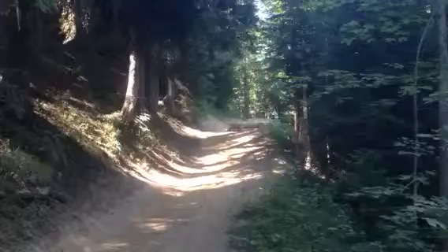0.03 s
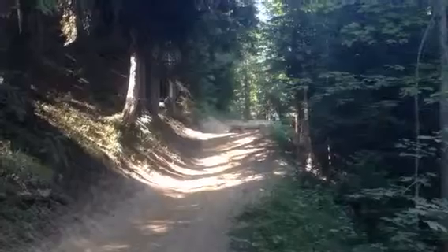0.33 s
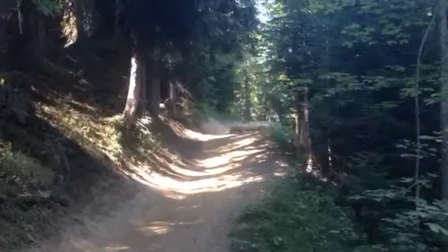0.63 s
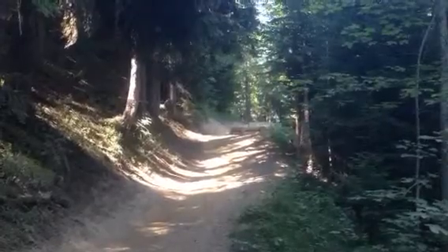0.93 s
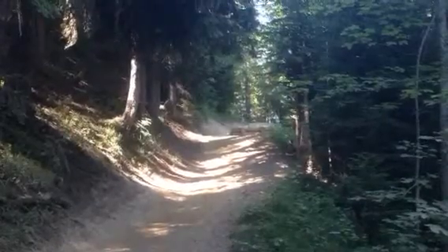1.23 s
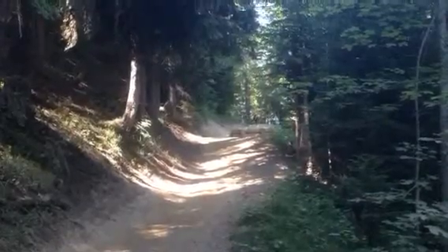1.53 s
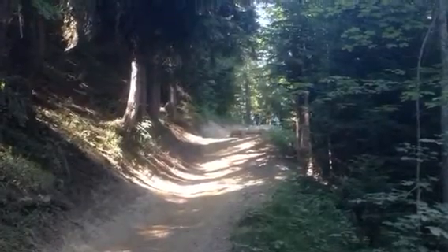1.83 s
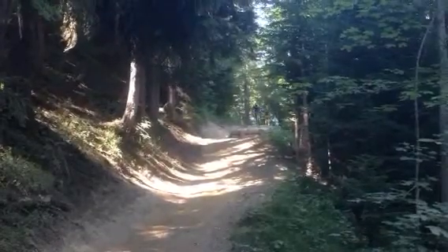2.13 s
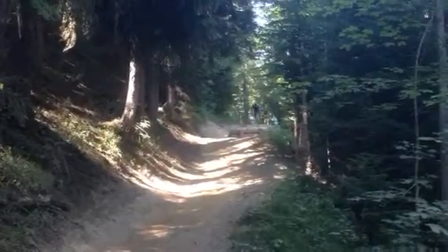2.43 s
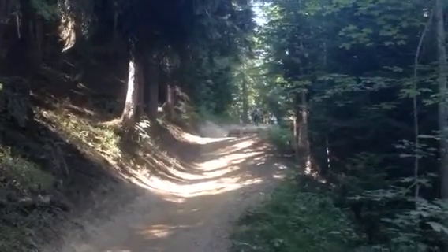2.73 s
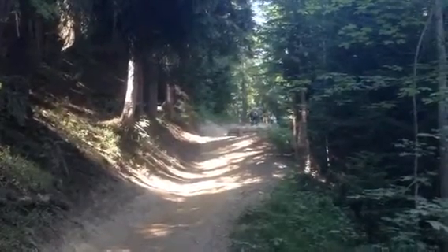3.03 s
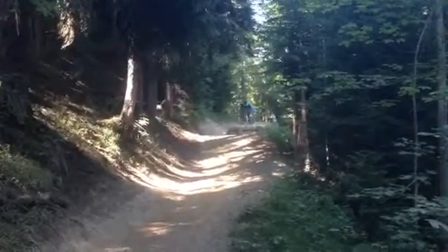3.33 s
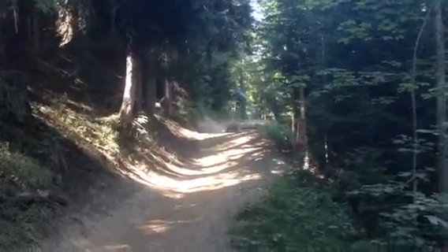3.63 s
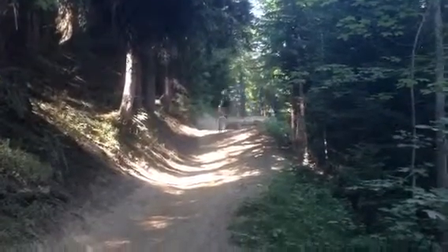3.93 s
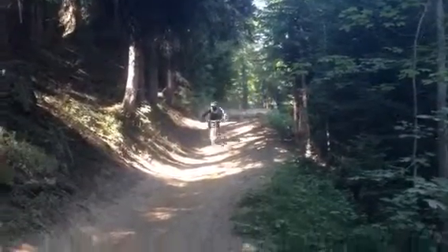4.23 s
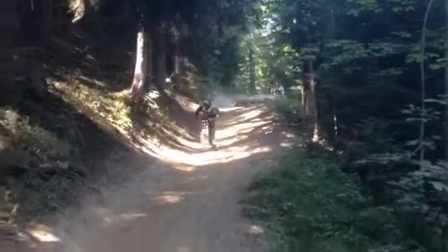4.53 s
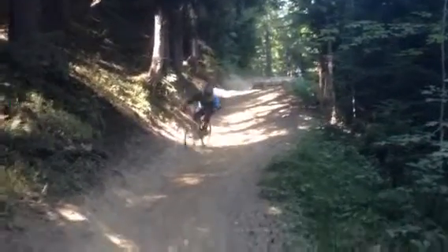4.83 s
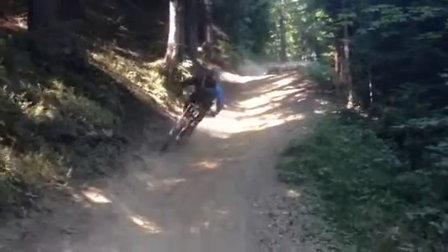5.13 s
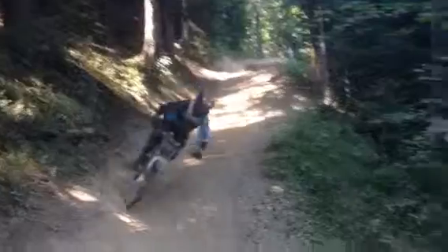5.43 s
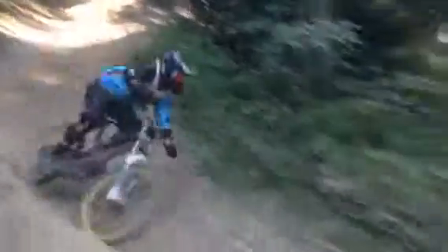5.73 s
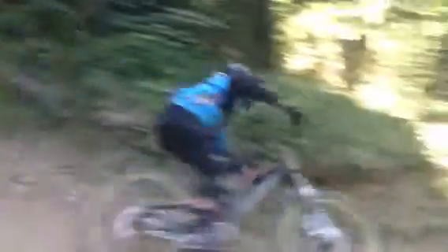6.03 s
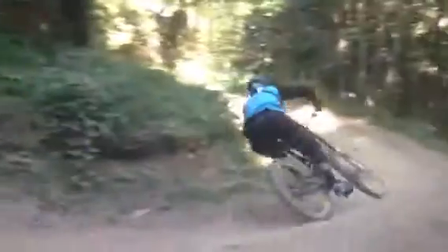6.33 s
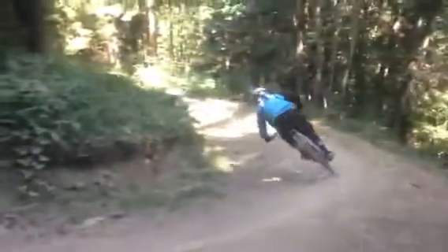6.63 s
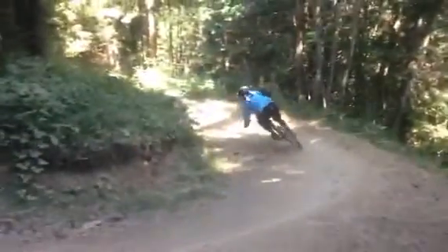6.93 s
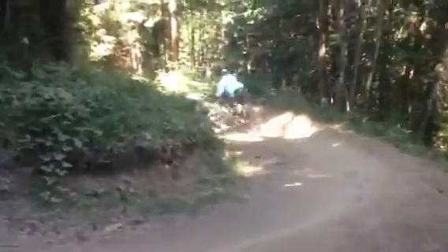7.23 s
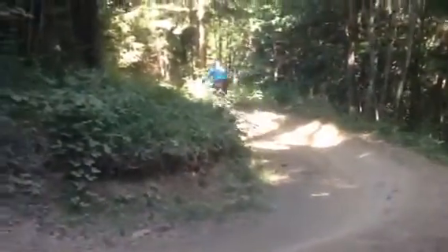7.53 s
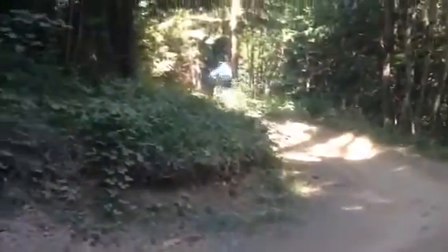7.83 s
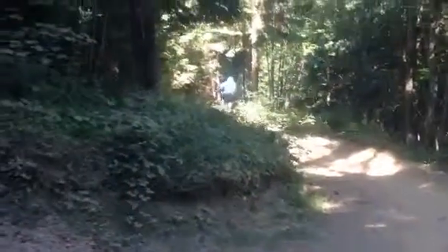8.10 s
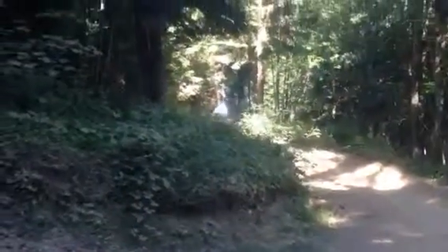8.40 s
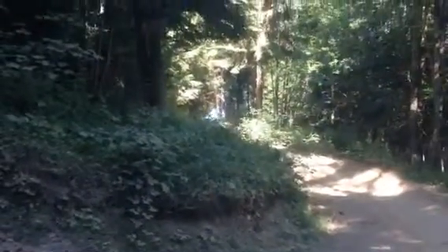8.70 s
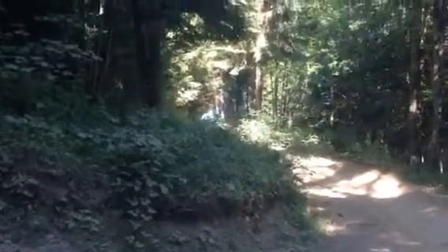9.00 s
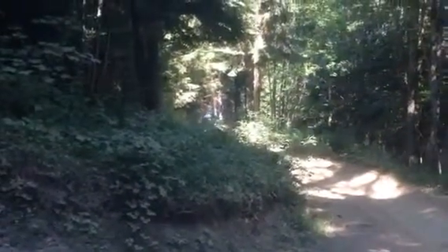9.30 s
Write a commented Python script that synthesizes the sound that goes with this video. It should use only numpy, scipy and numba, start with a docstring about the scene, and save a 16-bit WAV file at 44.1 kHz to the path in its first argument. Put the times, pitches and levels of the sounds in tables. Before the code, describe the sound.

A soft, steady forest hiss with a low rumble runs throughout. In the first second there are a few faint handling ticks. Until about 4 seconds, a mountain bike is only distant, with light tyre crunch, small knocks and dull thuds. At about 4.2 seconds it lands off a small drop with a clatter, and the knobbly tyres begin crunching and drumming on the dirt, coming nearer. Stones knock the wheels, with the sharpest knock near 5.7 seconds. The bike passes close between 5.6 and 6.4 seconds, the loudest part, with low thuds from ruts, bright chain clinks, frame rattle, sprayed grit and a faint freewheel sizzle. Crunching and clinking continue as it rides away, dropping off at about 7.4 seconds. A few soft, distant thuds and knocks follow until about 9.5 seconds. The trees add a slight, short echo.

```python
"""Mountain bike on a forest trail

A bike comes down a dirt trail, lands off a small drop, leans past close by and rides away.
Knobbly tyres crunch the dirt and drum with the air inside; stones knock the wheels, ruts thud,
the frame clatters, the chain clinks, the freewheel sizzles. Trees scatter it over low rumble and hiss."""
import sys
import numpy as np
from scipy import signal
from scipy.fft import rfft, irfft
from scipy.io import wavfile
from scipy.ndimage import uniform_filter1d
from numba import njit

SR = 44100
rng = np.random.default_rng(int(sys.argv[2]) if len(sys.argv) > 2 else 0)


def wav_record(signal):
    """Record a signal, one row per channel, as 16-bit PCM in the file named by sys.argv[1]."""
    frames = np.transpose(np.atleast_2d(signal))
    bounded = np.clip(frames, -1, 1)
    # unit amplitude maps onto the largest positive 16-bit level
    quanta = np.round(bounded * 32767).astype(np.int16)
    wavfile.write(sys.argv[1], SR, quanta)


N = 421596

# ticks of a hand-held case: t/s, level/dB
CASE_TICKS = [(0.1376, -55), (0.271, -53), (0.4075, -58), (0.4938, -57), (0.6843, -50), (0.7567, -49),
              (0.7637, -54)]
# distant thuds: t/s, level/dB
THUDS = [(0.694, -52.5), (0.774, -52), (2.172, -58), (2.803, -56), (3.55, -53), (7.473, -44.5), (7.92, -53),
         (8.014, -56), (8.08, -57), (8.291, -47.5), (9.308, -56)]
# distant rough stretches: t/s, rise/s, level/dB, decay/(dB/s)
STRETCHES = [(0.85, 0.28, -66.5, 5), (2.78, 0.15, -62, 15.5), (8.47, 0.076, -66.5, 7),
             (9.42, 0.15, -81, 10)]
# chain slaps: t/s, level/dB, f/Hz
CLINKS = [(4.2696, -46.5, 4360), (4.317, -38, 4300), (4.7542, -41, 4270), (4.9092, -35.5, 3700),
          (4.9651, -43.5, 4100), (5.064, -49, 4200), (5.1497, -47, 4300), (5.251, -46.5, 4150),
          (5.484, -40.5, 6340), (5.506, -35.5, 2980), (5.547, -44, 5740), (5.575, -38, 2940),
          (5.6123, -41, 2800), (5.676, -37, 2820), (5.769, -39, 2740), (5.8328, -24.5, 3230),
          (5.877, -43.5, 5670), (5.9287, -27.5, 3900), (5.956, -32.5, 2700), (5.977, -54, 2980),
          (5.9979, -23.5, 2940), (6.009, -28, 2940), (6.0215, -32, 2960), (6.046, -32, 2930),
          (6.1, -27, 3000), (6.1135, -21, 2920), (6.1405, -26, 2900), (6.177, -38, 2980),
          (6.201, -36, 3230), (6.209, -31.5, 3350), (6.2604, -44, 3330), (6.3366, -42, 3380),
          (6.352, -45.5, 6650), (6.385, -37.5, 4130), (6.463, -43, 3410), (6.495, -41, 3530),
          (6.516, -34.5, 4150), (6.564, -44, 3400), (6.617, -37, 3750), (6.6642, -38.5, 3640),
          (6.7258, -38.5, 3570), (6.809, -46, 3930), (6.842, -38, 3530), (6.8594, -29.5, 3820),
          (6.9137, -39.5, 3700), (6.938, -36, 3530), (6.9791, -52, 3360), (7.039, -45, 3950),
          (7.062, -42.5, 3390), (7.1023, -48, 3440), (7.159, -45, 3760), (7.2056, -41, 3400),
          (7.259, -40, 3170), (7.3136, -45, 3760)]
# frame, fork and mudguard hits: t/s, level/dB
CLATTERS = [(2.799, -52.5), (3.295, -54), (4.19, -49), (4.226, -44), (4.296, -38.5), (4.321, -40),
            (4.714, -44), (4.757, -38), (5.078, -34), (5.086, -32.5), (5.173, -35), (5.186, -37),
            (5.558, -42), (5.677, -28), (5.767, -32), (5.833, -29), (6.009, -27.5), (6.291, -36)]
# wheel drops into ruts: t/s, level/dB, f/Hz
RUTS = [(5.555, -31.5, 80), (5.572, -37, 240), (5.659, -25, 207), (5.669, -35, 110), (5.763, -37, 72),
        (5.838, -39, 80), (5.884, -38, 85), (5.953, -32, 129), (5.971, -29, 284), (6.061, -36, 78),
        (6.119, -41, 100), (6.197, -31, 93), (6.295, -37, 89.5), (6.335, -27.5, 102), (6.377, -43, 100),
        (6.416, -36, 89.5), (6.455, -42, 84.5), (6.535, -39, 170), (6.573, -31.5, 113), (6.59, -42, 120),
        (6.608, -36, 100), (6.755, -44, 140), (6.821, -46, 65), (6.88, -48, 100), (6.893, -33.5, 230),
        (7.057, -39, 87), (7.107, -43, 83), (7.172, -48, 83), (7.221, -51, 90), (7.255, -48, 116)]
# stones and ruts hitting the wheels: t/s, ring level/dB, ring f/Hz, thump level/dB, dirt level/dB
KNOCKS = [(0.991, -49, 490, -63, -58), (1.038, -50, 555, -51, -63), (1.207, -56, 990, -70, -53),
          (1.328, -50, 565, -64, -56), (1.405, -48, 594, -67, -60), (1.505, -52, 1020, -53, -57),
          (1.608, -47, 564, -53, -56.5), (1.734, -53, 510, -70, -58), (2.804, -43, 900, -61, -53),
          (4.1966, -42, 1870, -60, -43.5), (4.228, -33.5, 796, -52, -42), (4.279, -28, 663, -52, -42),
          (4.303, -32, 1240, -42.5, -45), (4.553, -36, 876, -43, -43), (4.6, -26.5, 853, -54, -43),
          (4.658, -35, 890, -56, -49), (4.7034, -32, 960, -43, -38), (4.7175, -34.5, 1850, -41, -42),
          (5.083, -28.5, 1535, -38, -32.5), (5.177, -40, 1030, -41, -34), (5.466, -25.5, 653, -58, -33),
          (5.474, -28.5, 680, -52, -50), (5.559, -21.5, 790, -32, -28.5), (5.5774, -23, 482, -44, -31),
          (5.614, -31, 795, -48, -32), (5.652, -24, 735, -38, -40), (5.661, -6.5, 840, -27, -25.5),
          (5.6663, -17, 956, -36, -40), (5.68, -31, 1400, -42, -41), (5.732, -32, 452, -48, -44),
          (5.742, -29, 960, -50, -49), (5.767, -29, 800, -35.5, -26), (5.891, -26, 750, -36, -33),
          (5.955, -40, 704, -30.5, -33), (6.0641, -21, 860, -36, -36), (6.0878, -26, 740, -37, -45),
          (6.1643, -27, 720, -37, -31), (6.2015, -23, 904, -36, -28.5), (6.242, -34, 885, -59, -43),
          (6.292, -26, 1820, -45, -33), (6.336, -32, 1090, -32.5, -27.5), (6.348, -34, 1000, -50, -38),
          (6.381, -32, 920, -52, -44), (6.4242, -34, 850, -46, -38), (6.4596, -33, 876, -57, -38),
          (6.494, -30.5, 1230, -60, -36), (6.53, -34, 1740, -46, -41), (6.5772, -30, 1650, -38, -33.5),
          (6.6132, -41, 810, -39, -41), (6.749, -51, 750, -54, -58), (6.769, -40, 710, -47, -60),
          (6.827, -38, 1160, -50, -35), (6.8436, -19, 1110, -59, -33.5), (6.845, -22, 2000, -61, -42),
          (6.885, -37, 980, -52, -35), (6.8962, -40, 940, -45, -36), (6.9434, -33.5, 1920, -60, -36),
          (7.014, -42, 845, -48, -40), (7.045, -33, 850, -61, -50), (7.065, -34, 830, -47, -44),
          (7.114, -34.5, 695, -49, -31.5), (7.175, -26, 760, -36, -49), (7.193, -30.5, 1265, -42, -41),
          (7.2263, -24.5, 860, -44, -49), (7.243, -29.5, 1670, -41, -45), (8.734, -55, 730, -66, -47.5),
          (8.753, -49, 1970, -77, -53), (9.054, -58, 735, -71, -59), (9.507, -57, 1680, -67, -54)]
# tread bite after landing: t/s, f/Hz, level/dB
GROWL = [(4.2, 650, -85), (4.3, 686, -54), (4.37, 770, -54), (4.45, 710, -52), (4.58, 870, -55.5),
         (4.72, 890, -67), (4.95, 900, -62)]
# tyre crunch from the landing on: t/s, level/dB
ROLL = [(4.17, -76), (4.23, -53.5), (4.31, -42.5), (4.42, -50), (4.9, -48.5), (5.35, -50.5), (5.58, -44.5),
        (5.69, -42.5), (5.87, -40), (6.0, -38.5), (6.15, -38.5), (6.36, -45), (6.5, -44), (6.7, -46.5),
        (6.88, -46.5), (7.26, -45.5), (7.41, -57), (7.92, -62), (8.12, -70)]
# grit sprayed by sliding tyres: t/s, half-width/s, level/dB
SPRAYS = [(4.327, 0.024, -63), (4.94, 0.042, -65), (6.115, 0.039, -57), (6.89, 0.023, -63),
          (7.34, 0.1, -71), (9.158, 0.1, -66)]
# tyre air mode, higher and broader in the turn: t/s, f/Hz, width/Hz
CAVITY = [(4.2, 228.4, 26), (5.5, 230, 21), (5.75, 243, 63), (6.0, 260, 130), (6.18, 270, 120),
          (6.45, 217, 59), (7.3, 217, 39), (7.8, 210, 30)]

# resonances: f/Hz, width/Hz, level/dB
CASE_MODES = [(1360, 120, 3.5), (1850, 260, -5), (2140, 140, 2), (2870, 250, -15)]
THUD_MODES = [(210, 71, 11), (352, 59, -6), (560, 120, -42)]
TYRE_AIR_MODES = [(219.7, 25, 26), (262, 35, -23)]
PAWL_MODES = [(6300, 420, 0), (6700, 420, -1)]
SPROCKET_MODES = [(2565, 70, 15), (2912, 40, 17.5), (3100, 73, -5), (3800, 220, 2.5), (4240, 250, 0.5),
                  (4930, 270, -3), (5360, 300, 6.5), (5690, 300, 12), (6030, 240, 6.5), (7300, 260, -4)]
FRAME_MODES = [(1020, 73, -7), (1394, 77, -1), (1476, 57, 0), (1785, 65, -2.5), (1920, 77, 1),
               (2487, 83, -2)]
TREAD_MODES = [(2500, 280, 15), (2700, 370, -2), (2840, 110, -15), (3210, 240, -22)]

# ambient spectrum: f/Hz, level/dB
FOREST_TONE = [(12, -37), (20, -18.5), (61, 0), (112, -2), (140, -3), (244, -16), (341, -18), (462, -19.5),
               (664, -23), (1190, -26), (1290, -25.5), (1810, -24.5), (2820, -23), (3720, -27),
               (15400, -32)]
# clink spectra: f/Hz, level/dB
LINK_TONE = [(900, -18.5), (1900, 14), (2250, 4), (2550, 5), (2950, 7), (3450, 4.5), (3900, 9), (4400, 7),
             (6000, 0.5), (8000, -4), (9500, -23), (14000, -48)]
CRACK_TONE = [(1500, -50.5), (2500, -12.5), (3900, 3), (4600, 4.5), (5600, -4), (6500, 0.5), (7800, -5),
              (8900, -24.5), (14000, -30.5)]
EDGE_TONE = [(3000, -31), (6000, -8), (9700, 15), (11500, -8), (14500, -9)]
# knock spectra: f/Hz, level/dB
THUMP_TONE = [(20, -14), (45, -1), (90, -8.5), (180, -3.5), (300, -2.5), (500, -11), (900, -49),
              (3000, -71), (9000, -98)]
DIRT_TONE = [(100, 0.5), (300, -1.5), (800, 7.5), (1400, 5.5), (2050, 1.5), (2400, -11.5), (3200, -12),
             (5000, -25), (8000, -32), (13000, -66)]
# rolling spectra: f/Hz, level/dB
FAR_COMING_TONE = [(150, -7), (260, -6.5), (330, 2), (420, 0.5), (520, 7), (740, -5.5), (920, -0.5),
                   (1150, -5.5), (1500, -3), (2000, -5), (3000, -11.5), (6000, -21), (12000, -48)]
FAR_GOING_TONE = [(150, -6), (300, -11), (800, -2), (1300, -2), (1900, 3), (2400, -2.5), (3300, -6),
                  (6000, -13), (12000, -31)]
NEAR_COMING_TONE = [(150, -27), (310, 3.5), (480, 8), (660, 3.5), (830, 4), (1060, 0), (1270, -2),
                    (1500, 0), (1660, -2), (1880, 0.5), (2300, -12), (3200, -45), (5000, -20), (12000, -61)]
NEAR_GOING_TONE = [(150, -9), (320, 5), (420, -6.5), (500, 2.5), (580, 1.5), (810, 3), (1100, -5.5),
                   (1400, -1), (1700, -1.5), (2050, 1), (2400, -22), (2800, -19), (3400, -8), (5000, -40),
                   (12000, -64)]
RUMBLE_TONE = [(20, -19), (40, -19), (65, 4.5), (110, 3), (165, 9), (280, -19.5), (600, -39), (4000, -86)]
GRIT_TONE = [(1500, -2), (3000, -4.5), (3800, 1), (4250, -1.5), (4600, -3.5), (5600, -7), (6500, -5.5),
             (7600, -11.5), (8800, -17), (14000, -26)]

PASS_S, REAR_PASS_S = 5.81, 6.19


def undb(db):
    """dB to gain."""
    return 10 ** (np.asarray(db) / 20)


def unit(x):
    """Scale to rms 1."""
    return x / np.sqrt(np.mean(x ** 2))


def unit_peak(x):
    """Scale to peak 1."""
    return x / np.abs(x).max()


def add(out, at_s, x):
    """Mix x in at at_s."""
    i = max(int(at_s * SR), 0)
    out[i:i + len(x)] += x[:N - i]


def colour(x, tone, size=4096):
    """Minimum-phase filter; tone: f/Hz, level/dB."""
    hz, db = np.transpose(tone)
    log_hz = np.log(np.fft.rfftfreq(size, 1 / SR) + 1)
    log_gain = np.log(undb(np.interp(log_hz, np.log(hz), db)))
    cepstrum = irfft(log_gain)[:size // 2]
    cepstrum[1:] *= 2
    impulse = irfft(np.exp(rfft(cepstrum, size)))[:size // 2]
    return signal.fftconvolve(x, impulse)[:len(x)]


def ring(x, modes):
    """Parallel resonators; modes: f/Hz, width/Hz, level/dB."""
    return sum(undb(db) * signal.lfilter(*signal.iirpeak(hz, hz / width_hz, fs=SR), x)
               for hz, width_hz, db in modes)


@njit
def sweep(x, hz, width_hz):
    """State-variable band-pass with moving centre and width."""
    y, band, low = np.empty(len(x)), 0., 0.
    for i in range(len(x)):
        g, damping = np.tan(np.pi * hz[i] / SR), width_hz[i] / hz[i]
        v = (band + g * (x[i] - low)) / (1 + g * (g + damping))
        band, low, y[i] = 2 * v - band, low + 2 * g * v, damping * v
    return y


def fade(t, t60_s):
    """Exponential decay, -60 dB at t60_s."""
    return np.exp(-np.log(1000) * t / max(t60_s, 1e-3))


def swell(t, at_s, half_s, db):
    """Gaussian envelope."""
    return undb(db) * np.exp(-((t - at_s) / half_s) ** 2)


def walk(rate_hz):
    """Slewed random steps, rms 1."""
    hold = int(SR / rate_hz)
    steps = np.repeat(rng.standard_normal(N // hold + 1), hold)
    return unit(uniform_filter1d(steps, hold)[:N])


def grains(rate_hz, spread_db):
    """Tiny impacts at random times."""
    strength = undb(spread_db * np.clip(rng.standard_normal(N), -2, 2))
    return (rng.random(N) < rate_hz / SR) * strength * rng.choice([-1, 1], N)


def taps(table, modes, contact_t60_s, size=5000):
    """Short rough contacts on a resonant body."""
    out, t = np.zeros(N), np.arange(size) / SR
    for at_s, db in table:
        contact = rng.standard_normal(size) * fade(t, contact_t60_s)
        add(out, at_s, undb(db) * unit_peak(ring(contact, modes)))
    return out


def roll_gain(t):
    """Envelope of the near tyres."""
    return undb(np.interp(t, *np.transpose(ROLL), left=-120, right=-120))


def facing(t, coming_db, going_db):
    """Gain that shifts as the rear wheel passes."""
    behind = .5 + .5 * np.tanh((t - REAR_PASS_S) / 0.019)
    return undb(coming_db + (going_db - coming_db) * behind)


def forest(level_db=-60):
    """Steady hiss; the low rumble of the air wavers."""
    air = unit(colour(rng.standard_normal(N), FOREST_TONE))
    low = signal.sosfiltfilt(signal.butter(2, 220, fs=SR, output="sos"), air)
    waver_db = 1.2 * walk(6) + 2.6 * walk(28) - 0.7
    return undb(level_db) * (air + low * (undb(waver_db) - 1))


def trees(x, t60_s=0.33, send_db=-10.5):
    """Trunks and banks return a thin tail."""
    t = np.arange(SR) / SR
    echoes = rng.laplace(size=len(t)) * fade(t, t60_s) * (t > .006)
    tone = [(100, -5.5), (400, 3.5), (2000, -9.0), (5000, 1.5), (12000, 5.5)]
    impulse = colour(echoes / np.linalg.norm(echoes), tone)
    return undb(send_db) * signal.fftconvolve(x, impulse)[:N]


def case_ticks():
    """Faint contacts ring a hand-held case."""
    hits = taps(CASE_TICKS, CASE_MODES, contact_t60_s=0.011)
    return undb(3.5) * colour(hits, [(500, -14), (1200, 0.0), (2800, -1.0), (5000, -18)])


def far_thuds():
    """Soft, dull impacts in the distance."""
    hits = taps(THUDS, THUD_MODES, contact_t60_s=0.042)
    return undb(5.5) * colour(hits, [(600, -3.0), (2000, -31)])


def pebbles(count, spread_db, size=1000):
    """Stones flicked by the tread, each ringing at its own pitch; small ones shorter but harder."""
    out, t = np.zeros(N), np.arange(size) / SR
    for moment, pitch, sustain, force in rng.random((count, 4)):
        hz = 750 * 3.4 ** pitch
        decay = t * hz / (4.5 + 4 * sustain)
        ping = np.sin(2 * np.pi * hz * t) * np.exp(-decay) * (1 - np.exp(-6 * decay))
        add(out, moment * N / SR, undb(spread_db * force) * np.sqrt(hz) * ping)
    return unit(out)


def far_tyres(drum_db=-3):
    """Distant crunch and drumming; each rough stretch swells and dies away."""
    t = np.arange(N) / SR
    gain = sum(np.clip((t - at_s) / rise_s, 0, 1) * undb(db - db_per_s * np.maximum(t - at_s - rise_s, 0))
               for at_s, rise_s, db, db_per_s in STRETCHES)
    stones = undb(-18) * pebbles(count=900, spread_db=12)
    crush = (unit(grains(rate_hz=2200, spread_db=2.5)) + stones) * undb(1.2 * walk(70))
    bumps = grains(rate_hz=750, spread_db=2.5)
    air = unit(ring(ring(bumps, TYRE_AIR_MODES), [(226, 170, 0)]))
    dirt = np.where(t < PASS_S, unit(colour(crush, FAR_COMING_TONE)), unit(colour(crush, FAR_GOING_TONE)))
    return gain * (dirt + undb(drum_db + 2 * walk(5.4)) * air)


def freewheel(nominal_hz=310, level_db=-60.5, nearest_s=6.17, half_s=0.25):
    """Coasting: pawls tick fast and unevenly, a sizzle that peaks as the hub passes."""
    t = np.arange(N) / SR
    teeth = np.floor(np.cumsum(nominal_hz * undb(3 * walk(400))) / SR)
    ticks = np.diff(teeth, prepend=0) * undb(6.5 * walk(120))
    sizzle = unit(ring(ring(ticks, PAWL_MODES), [(6250, 2300, 0)]))
    return undb(level_db) * sizzle / (1 + ((t - nearest_s) / half_s) ** 2)


def chain_rattle(count=24, re_roll_db=-8, base_hz=3300):
    """Small random clinks that follow the tyre level: t/s, level/dB, f/Hz."""
    start_s, end_s = ROLL[0][0], ROLL[-1][0]
    times_s = start_s + (end_s - start_s) * (np.arange(count) + rng.random(count)) / count
    return [(at_s, 20 * np.log10(roll_gain(at_s)) + re_roll_db + 2 * force, base_hz * 2 ** (.45 * pitch))
            for at_s, (force, pitch) in zip(times_s, rng.uniform(-0.64, 1, (count, 2)))]


def chain(lag_s=0.0034, size=4000):
    """Links slap frame and sprockets: both links and sprockets ring, with a crack and a bright edge."""
    out, t = np.zeros(N), np.arange(size) / SR
    next_links = undb(-10) * (t > lag_s) * fade(np.abs(t - lag_s), 0.013)
    for at_s, db, hz in list(CLINKS) + chain_rattle():
        contact = rng.standard_normal(size) * (fade(t, 0.015) + next_links)
        link = unit_peak(ring(contact, [(hz, 380, 0), (hz * rng.uniform(0.77, 1.45), 450, -2)]))
        sprockets = unit_peak(ring(contact, SPROCKET_MODES))
        metal = unit_peak(colour(undb(5.5) * link + sprockets, LINK_TONE))
        crack = unit_peak(colour(unit_peak(contact) + undb(-2) * sprockets, CRACK_TONE))
        edge = unit_peak(colour(contact * fade(t, 0.02), EDGE_TONE)) * facing(at_s, -29, -15.5)
        add(out, at_s, undb(db) * (undb(2.5) * metal + undb(-2) * crack + edge))
    return out


def frame_clatter():
    """Frame, fork and mudguard clatter with a hollow ring."""
    hits = taps(CLATTERS, FRAME_MODES, contact_t60_s=0.053)
    return colour(hits, [(400, 2), (900, 2.5), (2500, -3.5), (3400, -21.5)])


def ruts(squash_cycles=0.53, size=5000):
    """The tyre squashes and springs back within a cycle or two: a dull thud."""
    out, t = np.zeros(N), np.arange(size) / SR
    for at_s, db, hz in RUTS:
        squash = t * hz / squash_cycles
        add(out, at_s, undb(db) * np.sin(2 * np.pi * hz * t) * squash ** 2 * np.exp(2 - 2 * squash))
    return out


def knocks(soft_rise_s=0.0021, hard_above_db=-27.5, rim_hz=1930, dirt_lead_s=0.001974, size=6000):
    """A stone rings wheel and rim, the tyre thumps; loose dirt gives way just ahead of the blow."""
    out, t = np.zeros(N), np.arange(size) / SR
    for at_s, ring_db, hz, thump_db, dirt_db in KNOCKS:
        contact = t / soft_rise_s * undb(0.58 * max(ring_db - hard_above_db, 0))  # harder is shorter
        blow = contact ** 2 * np.exp(2 - 2 * contact)
        after_ring = undb(-10) * (1 - np.exp(-contact)) * np.exp(-contact / 5)
        partials = np.sin(2 * np.pi * hz * t) + undb(-26) * np.sin(2 * np.pi * rim_hz * t)
        wheel = partials * np.maximum(blow, after_ring)
        noise = rng.standard_normal((2, size)) * (1 - fade(t, 0.026))  # soft tyre slows the onset
        thump = unit_peak(colour(noise[0] * fade(t, 0.069), THUMP_TONE))
        dirt = unit_peak(colour(noise[1] * fade(t, 0.063), DIRT_TONE))
        add(out, at_s, undb(ring_db - 5.5) * wheel + undb(thump_db) * thump)
        add(out, at_s - dirt_lead_s, undb(dirt_db - 0.9) * dirt)
    return out


def tread_growl(width_hz=170):
    """Tread blocks slap the dirt and ring a broad resonance that shifts with tyre load."""
    t = np.arange(N) / SR
    times_s, hz, db = np.transpose(GROWL)
    carrier = np.exp(2j * np.pi * np.cumsum(np.interp(t, times_s, hz)) / SR)
    slaps = grains(rate_hz=500, spread_db=2) * undb(2 * walk(30))
    baseband = signal.sosfilt(signal.butter(2, width_hz / 2, fs=SR, output="sos"), slaps / carrier)
    return unit((baseband * carrier).real) * undb(np.interp(t, times_s, db, left=-120, right=-120))


def tyre_drum(t, load, ref_db=-52, growth_db_per_db=0.56):
    """Bumps ring the air in the tyres; this grows more slowly than the crunch."""
    bumps = grains(rate_hz=830, spread_db=1.5) * undb(3.2 * load + 2.2 * walk(16))
    times_s, centres_hz, widths_hz = np.transpose(CAVITY)
    hz, width_hz = np.interp(t, times_s, centres_hz), np.interp(t, times_s, widths_hz)
    air = unit(sweep(sweep(bumps, hz, width_hz), hz, width_hz + 200) / np.sqrt(width_hz))
    gain = facing(t, -52, -55.5) * (roll_gain(t) / undb(ref_db)) ** growth_db_per_db
    smooth_ground_hum = swell(t, at_s=7.82, half_s=0.07, db=-66)
    return (gain + smooth_ground_hum) * air


def dirt_crunch(t, load, turn_s=0.11):
    """Tread crushes dirt and loose stones, heard from the front, then from behind."""
    stones = facing(t, -12.5, -11.5) * pebbles(count=1400, spread_db=7.5)
    crush = (unit(grains(rate_hz=2200, spread_db=2)) + stones) * undb(1.7 * load)
    coming, going = unit(colour(crush, NEAR_COMING_TONE)), unit(colour(crush, NEAR_GOING_TONE))
    behind = .5 + .5 * np.tanh((t - PASS_S) / turn_s)
    return undb(-3.5) * roll_gain(t) * ((1 - behind) * coming + behind * going)


def near_tyres():
    """Bumps load the tyre: crunch, drumming, ground rumble, tread rasp and grit swell together."""
    t = np.arange(N) / SR
    roll, load = roll_gain(t), walk(55)
    crunch = dirt_crunch(t, load)
    drum = tyre_drum(t, load)
    jolts = grains(rate_hz=280, spread_db=3) * undb(2.3 * load)
    rumble = roll * facing(t, -14, -10) * unit(colour(jolts, RUMBLE_TONE))
    scrape = grains(rate_hz=1800, spread_db=4) * undb(2.2 * load)
    tread = unit(ring(ring(scrape, TREAD_MODES), [(2700, 640, 0)]))
    scuff = swell(t, at_s=6.07, half_s=0.11, db=-54)
    rasp = (roll * facing(t, -18, -24.5) + scuff) * tread
    spray = unit(colour(grains(rate_hz=4200, spread_db=0.5) * undb(3.9 * load), GRIT_TONE))
    slides = sum(swell(t, *row) for row in SPRAYS)
    grit = undb(-1.5) * (roll * facing(t, -17.5, -12.5) + slides) * spray
    return crunch + drum + rumble + rasp + grit


def scene():
    """Bike and thuds with their echoes, over case ticks and forest air; mono."""
    clatter = frame_clatter()
    bike = far_tyres() + near_tyres() + tread_growl() + knocks() + ruts() + clatter + chain() + freewheel()
    trail = bike + far_thuds()
    return (trail + case_ticks() + trees(trail) + forest())[None]


def record(dry, start_s=.07, ramp_s=.008, low_hz=28, top_hz=15450):
    """Brief silence, fast fade-in, band limit."""
    gate = np.clip((np.arange(N) / SR - start_s) / ramp_s, 0, 1)
    high_passed = signal.sosfilt(signal.butter(2, low_hz, "high", fs=SR, output="sos"), dry * gate)
    return signal.sosfilt(signal.ellip(12, .1, 70, top_hz, fs=SR, output="sos"), high_passed)


dry = scene()
out = record(dry)
wav_record(out)
```